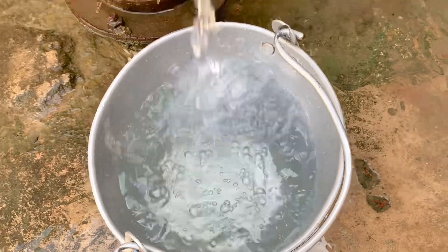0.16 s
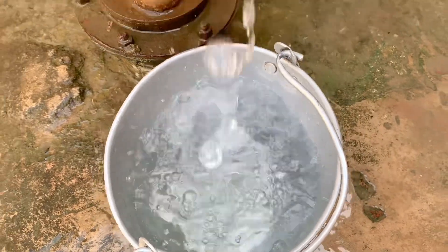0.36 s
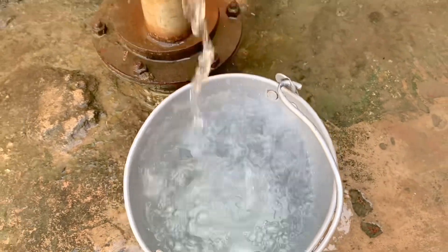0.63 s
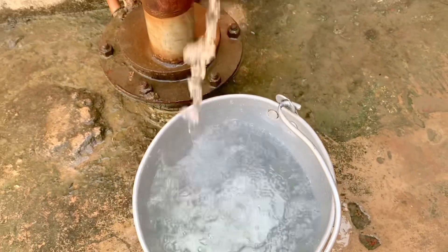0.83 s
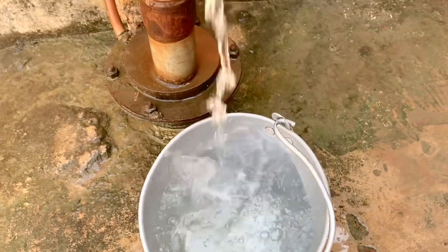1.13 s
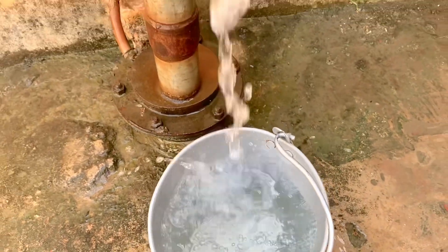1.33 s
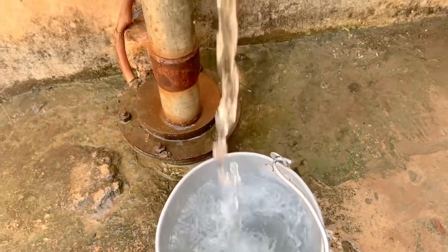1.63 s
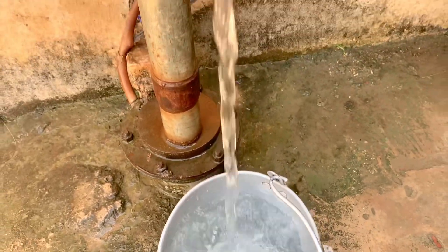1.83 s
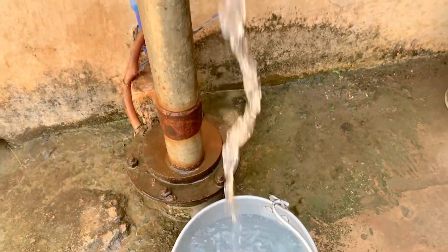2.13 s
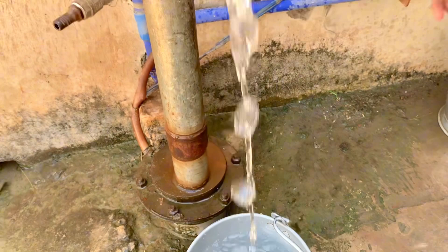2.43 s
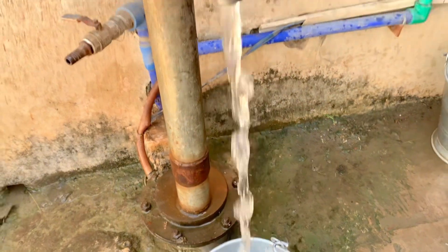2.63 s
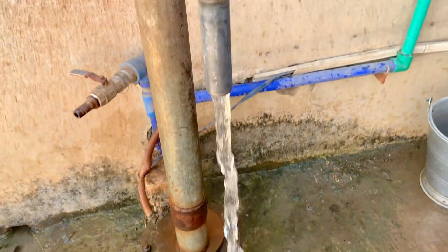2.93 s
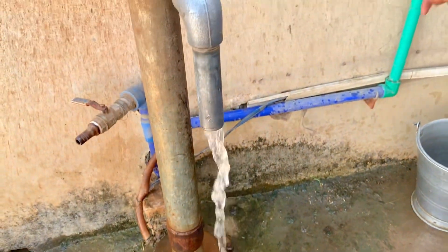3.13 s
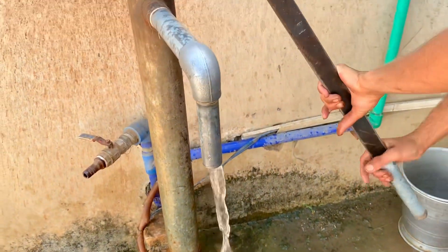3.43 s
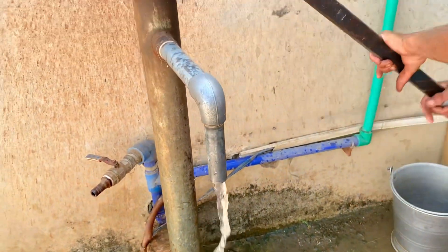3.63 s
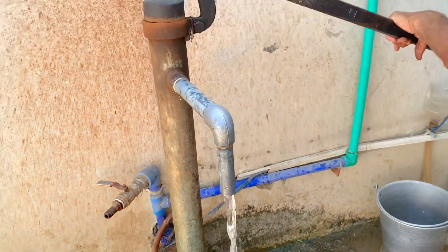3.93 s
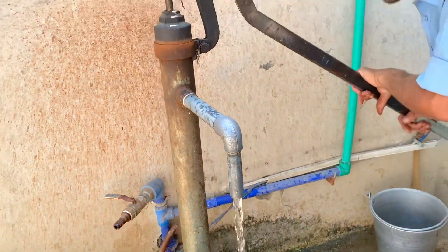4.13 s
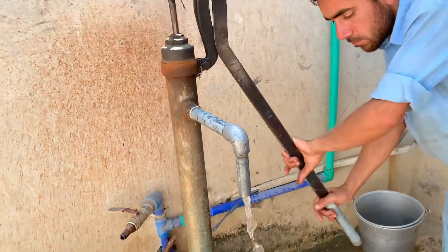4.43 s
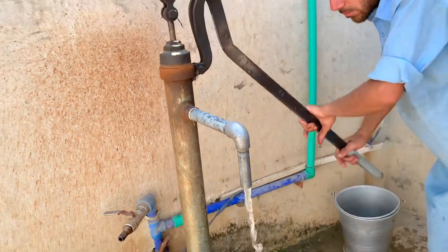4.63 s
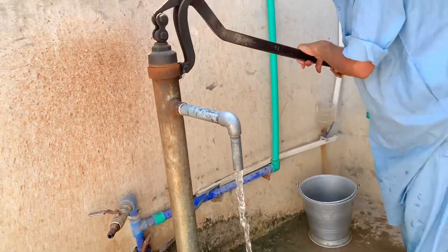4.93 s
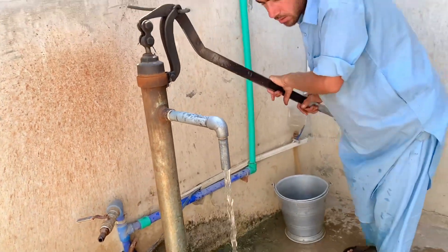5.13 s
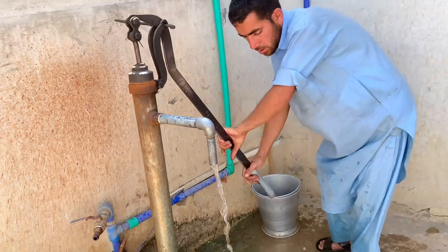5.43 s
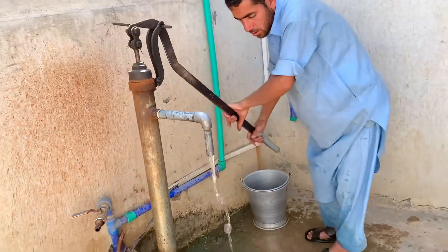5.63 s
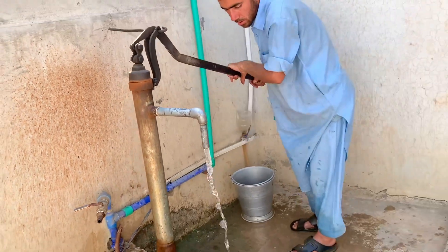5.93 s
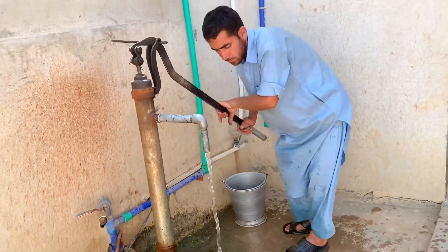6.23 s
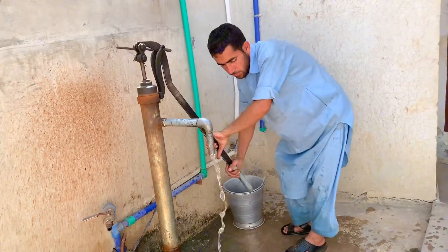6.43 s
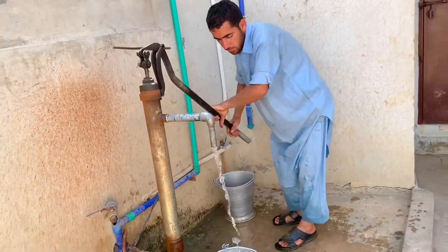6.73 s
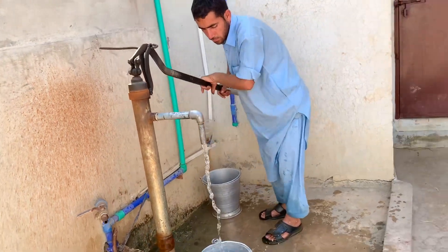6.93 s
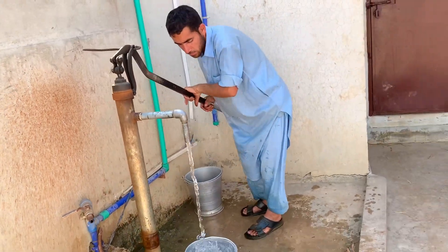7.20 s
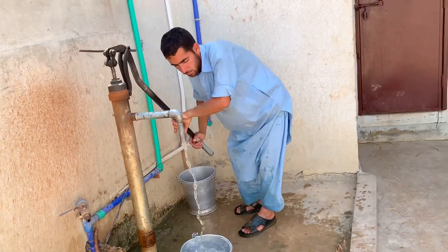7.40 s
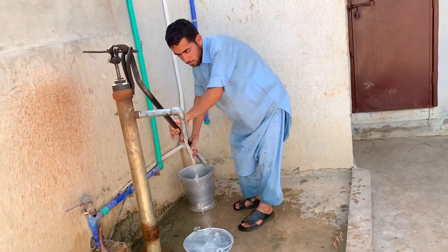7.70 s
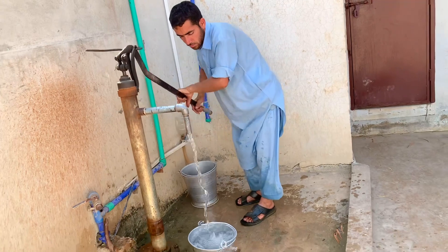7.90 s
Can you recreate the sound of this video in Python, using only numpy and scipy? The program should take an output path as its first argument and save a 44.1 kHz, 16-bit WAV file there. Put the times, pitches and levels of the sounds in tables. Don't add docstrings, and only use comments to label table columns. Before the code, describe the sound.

Close, bubbling water pours from a hand pump into a steel bucket outdoors, bright splats and rising blips growing quieter amid low wind bumps.

```python
import sys
import numpy as np
from scipy import signal
from scipy.fft import rfft, irfft
from scipy.io import wavfile
from scipy.ndimage import uniform_filter1d

SR = 44100
rng = np.random.default_rng(int(sys.argv[2]) if len(sys.argv) > 2 else 0)


def elevation(decibels):
    levels = np.asarray(decibels, float)
    return 10 ** (levels / 20)


def file_out(sig):
    cols = np.atleast_2d(sig).T
    lim = np.clip(cols, -1, 1)
    pcm = np.round(lim * 32767).astype(np.int16)
    wavfile.write(sys.argv[1], SR, pcm)


N = 355446

# time in seconds, level in dB.
GUST_CURVE = [(0.0, -47.5), (0.4, -37.5), (1.66, -43), (2.2, -43), (2.85, -41.5), (3.77, -39), (3.97, -43),
              (4.9, -39.5), (5.36, -38), (5.57, -38.5), (6.08, -36.5), (6.37, -44), (6.62, -42),
              (6.82, -41), (7.07, -37.5), (7.23, -42), (7.45, -41), (7.59, -40), (8.06, -40.5)]
# start in seconds, peak in dB, pitch in Hz.
WIND_KNOCKS = [
    (2.382, -17.5, 177),
    (3.131, -18, 188),
    (5.426, -12, 119),
    (5.477, -11.5, 161),
    (5.691, -14, 97),
    (5.737, -22, 66),
    (6.015, -14, 98.2),
    (6.099, -15.5, 105.4),
]
# start in seconds, peak in dB, pitch in Hz.
SOFT_KNOCKS = [(0.266, -28, 186), (0.95, -40, 54.3), (1.358, -21, 93), (1.472, -24.5, 72),
               (1.796, -22.5, 85), (2.555, -25, 86.5), (3.869, -24.5, 68), (4.146, -24, 182),
               (6.268, -24, 61), (6.598, -23, 82), (7.02, -24, 80), (7.208, -23.5, 68.4), (7.549, -24, 84),
               (7.699, -31, 62.7)]
# frequency in Hz, level in dB per Hz.
WIND_COLOUR = [(13, -30), (22, -49), (48, 4), (80, 1.5), (190, -3), (247, -9.5), (300, -8), (351, -8.5),
               (500, -26.5), (650, -58), (1100, -120)]
# frequency in Hz, phase turn in rad, level in dB, unshared part from 0 to 1.
PORT_DIFFERENCE = [(50, .35, -.1, .33), (160, .7, -.5, .42), (300, 0, -3.5, .35), (480, .3, -2.5, .7),
                   (650, 1.9, -4, .7), (860, 2.7, -1.9, .55), (1400, 3.4, 1.5, .5), (1850, 3.1, 2, .8),
                   (2400, 1.8, 0, .78), (3000, 2.8, 0, .72), (3900, 4.1, 0, .6), (4500, 3.8, 0, .33),
                   (16000, 3.8, 0, .42)]
# start in seconds, peak in dB.
JOLTS = [(0.165, -22), (0.265, -21), (0.496, -24), (3.13, -37), (4.006, -56), (4.13, -25.5), (4.933, -23.5),
         (5.001, -22.5), (5.237, -12.5), (5.994, -26.5), (6.93, -26.5), (7.05, -33), (7.151, -26),
         (7.303, -31.5)]
# time in seconds, resonance in Hz, its level in dB, deep gurgle over the rest in dB.
AIR_CURVE = [(0, 1150, 2.5, 18.5), (0.31, 1130, 4, 9.5), (0.38, 1127, -20, 10.5), (0.58, 1110, 8, 6.5),
             (0.801, 1160, 3.5, 12), (0.9, 1190, -6, 12.5), (1.002, 1210, 1, 13), (1.497, 1306, -1.5, 8),
             (2.2, 1450, -9, 10), (2.55, 1513, -7, 3), (2.9, 1590, -9, 7.5), (3.301, 1670, -8, 4.5),
             (4.402, 1645, -11, 8), (4.699, 890, -9, 4.5), (6.199, 873, -1, -2.5), (8.06, 888.4, -4, -4)]
# time in seconds, level in dB.
MOUTH_CURVE = [(0, -7), (1.5, -3), (2.6, -9), (4.2, -6.5), (5.5, -1.5), (6.1, 4), (6.5, -4), (7.1, -2),
               (8.06, -6)]
# frequency in Hz, level in dB per Hz.
GURGLE_COLOUR = [(210, -27), (350, -19.5), (458, -11), (561, -14.5), (700, -8), (1140, 0.5), (1320, 1.5),
                 (2250, 6.5), (2830, 2.5), (3500, -2), (4550, 4), (7700, -120)]
# start in seconds, peak in dB, pitch in Hz.
LARGE_BUBBLES = [(0.05, -7.5, 1060), (0.087, -11, 1130), (0.115, -28, 1220), (0.154, -12.5, 586),
                 (0.181, -37, 1110), (0.211, -9, 1080), (0.331, -10.5, 1130), (0.681, -15, 1180),
                 (0.754, -29, 1130), (0.786, -14.5, 1126), (0.981, -13, 1170), (1.029, -10, 1130),
                 (1.333, -8.5, 1176), (1.578, -12, 1840), (1.769, -13, 940), (2.12, -11.5, 1250),
                 (2.164, -17, 1420), (2.277, -4, 2170), (2.502, -16, 2100), (2.868, -12, 1180),
                 (2.901, -12.5, 780), (2.946, -15, 784), (3.126, -11, 1180), (3.401, -20, 1250),
                 (3.725, -12, 2280), (4.116, -5.5, 1270), (4.41, -12.5, 880), (4.81, -20, 1560),
                 (4.837, -14, 2290), (5.269, -9.5, 1620)]
# start in seconds, peak in dB, pitch in Hz.
MORE_LARGE_BUBBLES = [(0.269, -12.5, 566), (0.3, -8.5, 1030), (0.479, -20, 1270), (0.606, -14, 1110),
                      (0.698, -21, 1070), (1.203, -14, 1210), (1.414, -26, 1270), (1.671, -14, 1310),
                      (2.329, -16, 1040), (2.383, -8.5, 2220), (2.433, -20.5, 820), (2.802, -15, 2150),
                      (3.03, -19, 1700), (3.083, -21, 630), (3.145, -16, 1100), (3.928, -12.5, 1420),
                      (4.326, -21, 1470), (4.517, -18, 1460), (4.9, -6.5, 2200), (5.146, -11.5, 1650),
                      (5.516, -14, 1500), (5.555, -18, 1560), (5.802, -20, 1520), (5.902, -11, 1700),
                      (6.165, -15.5, 958), (6.239, -24, 745), (7.058, -18, 900), (7.159, -19, 1752),
                      (7.289, -24, 1290), (7.655, -18, 1320)]
# start in seconds, peak in dB, pitch in Hz.
SMALL_BUBBLES = [(0.462, -13.5, 1150), (0.815, -17, 1120), (1.052, -28, 3101), (1.242, -28, 3553),
                 (1.35, -35, 2756), (1.377, -27, 3208), (1.501, -22.5, 830), (1.545, -24, 2460),
                 (1.792, -32, 2950), (1.835, -32, 3402), (1.923, -22, 2239), (2.081, -40, 2283),
                 (2.104, -19, 830), (2.133, -32, 3553), (2.15, -26, 3596), (2.229, -14, 3600),
                 (2.352, -12, 1034), (2.68, -17, 3180), (2.734, -24, 790), (2.779, -16.5, 1094),
                 (2.971, -12, 2550), (3.105, -18.5, 720), (3.296, -19.5, 2550), (3.458, -23.5, 806),
                 (3.623, -50, 775), (4.019, -29, 3402), (4.365, -73, 1940), (4.954, -14, 1420),
                 (5.065, -16, 3260), (5.08, -14.5, 3430), (5.185, -49, 2500), (5.246, -22, 1190),
                 (5.349, -15.5, 2810), (5.373, -23, 2650), (5.43, -35, 430), (5.477, -43, 435),
                 (5.531, -15.5, 2110), (5.623, -20.5, 1970), (5.695, -29, 434), (5.968, -35, 1630),
                 (6.022, -29, 454), (6.216, -18.5, 3150), (6.339, -22, 1590), (6.4, -12.5, 3430),
                 (6.554, -30, 880), (6.569, -25, 890), (6.594, -52, 410), (6.632, -22, 2370),
                 (6.683, -42, 3590), (6.733, -31, 854), (6.826, -12, 3460), (7.083, -19, 2400),
                 (7.221, -22, 880), (7.486, -12, 3350), (7.551, -37, 2993), (7.668, -31, 2261),
                 (7.777, -17, 3300), (7.826, -29, 3359), (8.016, -37, 2347), (8.039, -25.5, 850),
                 (0.2, -27, 597), (0.32, -22.5, 530), (0.7, -22.5, 596), (0.94, -24, 1180),
                (1.035, -25, 490), (1.111, -13, 1880), (1.6, -24, 1430), (1.689, -21, 1400),
                (2.205, -17, 1460), (2.898, -21, 480), (3.09, -16, 1000), (3.128, -19, 700),
                (3.13, -12, 1660), (2.979, -19, 1050), (3.205, -27, 1210), (3.62, -15, 2230),
                (4.13, -20, 980), (4.546, -27, 1550), (4.99, -12, 2194), (5.085, -18, 1640),
                (5.57, -17, 1690), (5.72, -31, 810), (5.762, -28, 1610), (5.811, -29, 1530),
                (5.93, -28, 1470), (6.0, -28, 1530), (6.1, -26, 1700), (6.25, -23, 1390), (6.969, -26, 900),
                (6.999, -24, 1730), (7.1, -30, 1380), (7.179, -26, 890), (7.233, -16, 1320),
                (7.29, -29, 918), (7.44, -26, 1800), (7.489, -31, 1360), (7.635, -26, 1360),
                (7.9, -51, 1400)]
# time in seconds, level in dB.
FLOW_CURVE = [(0.0, -26), (0.18, -29.5), (0.29, -32.5), (1.55, -33), (2.06, -37.5), (2.38, -35),
              (2.94, -35), (3.66, -38), (3.99, -33.5), (4.15, -39.5), (4.37, -39), (4.58, -37.5),
              (4.83, -35.5), (5.27, -43.5), (5.61, -36), (5.88, -42.5), (7.61, -40.5), (8.06, -42)]
# frequency in Hz, level in dB per Hz.
SPRAY_COLOUR = [(1500, -14), (2800, -4), (3500, 0), (4600, -1), (5800, 1), (7200, 0), (8200, 1),
                (12000, -2), (14800, 0), (15700, -3), (19000, -3)]
SPRAY_BANDS = [1200, 3000, 4700, 9000, 13200, 19000]
# start in seconds, peak in dB, decay in seconds.
HEAVY_SLUGS = [(0.066, -9.5, 0.0023), (0.281, -8, 0.0026), (0.3292, -8.5, 0.0054), (0.432, -15.5, 0.0028),
               (0.48, -12, 0.0035), (0.551, -16.5, 0.0041), (0.784, -17, 0.0035), (0.9514, -13.5, 0.0053),
               (1.07, -8, 0.0023), (1.282, -14.5, 0.0027), (1.3364, -11, 0.0025), (1.476, -18, 0.0026),
               (1.543, -15.5, 0.0042), (1.5763, -14, 0.0025), (1.743, -22, 0.0026), (1.824, -14.5, 0.002),
               (2.164, -11, 0.0017), (2.385, -12, 0.0044), (2.7035, -13.5, 0.0026), (2.841, -19, 0.0028),
               (2.9453, -16, 0.011), (3.2915, -14.5, 0.0086), (3.3582, -15.5, 0.0034),
               (3.4437, -16, 0.0017), (3.695, -16.5, 0.0011), (4.4498, -18, 0.004), (4.892, -21.5, 0.029),
               (5.537, -22.5, 0.0031), (6.759, -25.5, 0.0039), (7.5522, -18.5, 0.003)]
# start in seconds, peak in dB.
LIGHT_SLUGS = [(0.038, -19), (0.3107, -9), (0.524, -5.5), (0.5976, -8), (0.643, -2.5), (0.8138, -25.5),
               (1.2222, -9.8), (1.246, -4.5), (1.354, -9), (1.3767, -7.5), (1.435, -5), (1.78, -11.5),
               (2.0016, -15), (2.2318, -10), (2.2758, -10), (2.5486, -19), (2.8054, -11), (3.0187, -18),
               (3.1278, -9.5), (3.4694, -10), (3.4801, -19), (3.7246, -11.5), (3.7351, -32),
               (3.8501, -11.5), (4.0087, -9.5), (4.1038, -16), (4.1468, -14.5), (4.3284, -17),
               (4.5173, -13.5), (4.5924, -19), (4.7158, -15), (4.8104, -24), (5.03, -17), (5.184, -16),
               (5.2692, -17), (5.495, -15), (5.5539, -14), (5.7166, -19), (5.904, -18), (6.4012, -22),
               (6.558, -18.5), (6.663, -18.5), (6.8285, -18), (7.0593, -15), (7.482, -13.5), (7.4954, -13),
               (7.6123, -20), (7.708, -18.5), (7.806, -15.5), (8.0008, -22)]
# start in seconds, peak in dB.
LIGHTER_SLUGS = [(0.016, -13), (0.1394, -34), (0.1515, -16), (0.171, -7), (0.187, -9), (0.257, -13),
                 (0.292, -6), (0.3737, -20), (0.495, -38), (0.724, -9), (0.9045, -8.5), (1.139, -10),
                 (1.203, -9.5), (1.412, -10.5), (1.704, -9.5), (1.902, -17), (1.9241, -13.5), (2.0122, -22),
                 (2.0354, -21), (2.092, -26), (2.3274, -10.5), (2.3443, -12), (2.372, -11), (2.4232, -10.5),
                 (2.499, -20), (2.586, -21), (2.6032, -12.5), (2.684, -15), (3.391, -14), (3.519, -15.5),
                 (3.5444, -22), (3.829, -17), (3.9984, -17), (4.4252, -16), (4.603, -15.5), (4.7523, -38),
                 (5.0133, -17), (5.0774, -15), (5.1427, -32), (5.2812, -13.5), (5.6823, -21), (6.0955, -43),
                 (6.2066, -18), (6.2196, -17), (6.8964, -20.5), (7.084, -17.5), (7.3264, -39),
                 (7.6673, -18), (7.829, -20), (8.014, -20),
                 (0.1189, -11), (0.4717, -36), (0.627, -11), (0.6644, -24), (0.695, -12), (0.984, -13.5),
                  (1.0584, -11), (1.5958, -8), (1.611, -30), (1.6691, -13), (1.8553, -31), (1.8853, -37),
                  (1.9431, -39), (2.137, -14.5), (2.238, -7), (2.4783, -29), (2.5103, -43), (2.526, -37),
                  (2.6481, -12), (2.7105, -13), (2.953, -14), (3.305, -10), (3.7802, -20.3), (3.9219, -20),
                  (3.9668, -23), (4.03, -28), (4.0826, -33), (4.3583, -43), (4.46, -23), (4.6663, -34),
                  (4.6867, -34), (4.975, -17), (5.0985, -27), (5.4505, -28), (5.4757, -18.5), (5.7446, -25),
                  (5.7614, -53), (5.8114, -27), (5.9128, -18), (5.9478, -28), (6.0523, -47), (6.24, -18.5),
                  (6.259, -18.5), (6.6853, -17), (6.8102, -39), (6.943, -20), (7.3628, -65), (7.78, -22),
                  (7.7883, -20), (7.8548, -20)]
STEREO_BANDS = [0, 96, 108, 120, 132, 144, 160, 176, 196, 216, 240, 264, 292, *range(320, 1025, 32)]

PORT_LAG_S = 0.000235
BUCKET_HZ, BUCKET_WIDTH_HZ, RING_S = 302, 26, 0.051
MOUTH_HZ, MOUTH_WIDTH_HZ = 1560, 360
CHURN_RISE_S, CHURN_FALL_S = 0.004, 0.05
CUTOFF_HZ = 15850
FRAME, FRAME_LEAD = 2048, 696


def rms_one(x):
    return x / np.sqrt(np.mean(x ** 2) + 1e-20)


def at_hz(hz, points, column=1):
    points = np.array(points)
    return np.interp(np.log(hz + 1), np.log(points[:, 0]), points[:, column])


def in_time(rows):
    s, *columns = np.transpose(rows)
    return [np.interp(np.arange(N) / SR, s, column) for column in columns]


def coloured(spectrum):
    hz = np.fft.rfftfreq(N, 1 / SR)
    low, high = spectrum[0][0], spectrum[-1][0]
    skirt = 1 / (1 + (low / (hz + 1)) ** 6 + (hz / high) ** 6)
    white = rfft(rng.standard_normal(N))
    return rms_one(irfft(white * elevation(at_hz(hz, spectrum)) * skirt, N))


def drift(rate):
    r = np.exp(-2 * np.pi * rate / SR)
    wander = signal.lfilter([1], [1, -2 * r, r * r], rng.standard_normal(N + SR))
    return rms_one(wander[SR:])


def add(out, s, sound):
    at = int(s * SR)
    out[at:at + len(sound)] += sound[:max(N - at, 0)]


def swells(rows, gain_db, rise_s, fall_s):
    out, t = np.zeros(N), np.arange(int(.4 * SR)) / SR
    shape = (1 - np.exp(-t / rise_s)) * np.exp(-t / fall_s)
    for s, peak_db, *_ in rows:
        add(out, s, elevation(2 * (peak_db + gain_db)) * shape / shape.max())
    return out


def bubble(hz, cycles, rise):
    t = np.arange(int(4 * cycles / hz * SR)) / SR
    decay = cycles / hz
    onset = 1 - np.exp(-t * hz * 2)
    return np.sin(2 * np.pi * hz * (t + rise * t * t / decay / 2)) * np.exp(-t / decay) * onset


def ports(x):
    hz = np.fft.rfftfreq(N, 1 / SR)
    turn = at_hz(hz, PORT_DIFFERENCE) - 2 * np.pi * hz * PORT_LAG_S
    own = np.clip(at_hz(hz, PORT_DIFFERENCE, column=3), 0, 1)
    paths = rng.standard_normal((5, 600)) * np.exp(-np.arange(600) / SR / .0025)
    shares = np.array([drift(25) for path in paths])
    shares = shares / np.sqrt(np.sum(shares ** 2, axis=0))
    scattered = sum(share * signal.oaconvolve(x, path)[:N] for share, path in zip(shares, paths))
    scattered = rms_one(scattered) * np.std(x)
    tilt = elevation(at_hz(hz, PORT_DIFFERENCE, column=2) / 2)
    shared = np.sqrt(1 - own ** 2) * np.exp(1j * turn) * rfft(x)
    right = tilt * (shared + own * rfft(scattered))
    return irfft(np.array([rfft(x) / tilt, right]), N)


def yard(x, lags_s, gain_db):
    out = np.zeros(N)
    for k, lag in enumerate(lags_s):
        add(out, lag, elevation(gain_db - 3.7 * k) * (-1) ** k * x)
    return signal.sosfilt(signal.butter(1, 6000, fs=SR, output="sos"), out)


def wind():
    gust_db, = in_time(GUST_CURVE)
    knocks = WIND_KNOCKS + SOFT_KNOCKS
    puffs = swells(knocks, -11.5, rise_s=0.0027, fall_s=0.02)
    wind_db = 10 * np.log10(elevation(2 * gust_db + 7.0) + puffs)
    out = elevation(wind_db - .8 + 2.2 * drift(14)) * coloured(WIND_COLOUR)
    for s, peak_db, hz in knocks:
        add(out, s, elevation(peak_db - 3.0) * bubble(hz, 3.1, rise=-0.011))
        hard_edge = bubble(2.31 * hz, 1.38, rise=-0.02)
        add(out, s + 0.00815, elevation(peak_db - 6.0) * hard_edge)
    return out


def bucket():
    jolt_power = swells(JOLTS, -3.5 - 19.0, rise_s=0.019, fall_s=0.12)
    hum_db = 10 * np.log10(elevation(2 * -47.5) + jolt_power)
    r, w = np.exp(-np.pi * BUCKET_WIDTH_HZ / SR), 2 * np.pi * BUCKET_HZ / SR
    shaken = signal.lfilter([1, 0, -1], [1, -2 * r * np.cos(w), r * r], rng.standard_normal(N))
    shaken = signal.sosfilt(signal.butter(2, [230, 390], "band", fs=SR, output="sos"), shaken)
    out = elevation(hum_db - 4.5) * rms_one(shaken)
    t = np.arange(int(RING_S * SR)) / SR
    ring = np.sin(np.pi * t / RING_S) * np.sin(2 * np.pi * BUCKET_HZ * t)
    for s, peak_db in JOLTS:
        add(out, s, elevation(peak_db - 6.5) * ring)
    return out


def air_column(gurgle_db):
    air_hz, air_db, _ = in_time(AIR_CURVE)
    phase = 2 * np.pi * np.cumsum(air_hz) / SR
    note = drift(38) * np.cos(phase) + drift(38) * np.sin(phase)
    return elevation(gurgle_db + air_db - 6 + 4.5 * drift(4.4)) * note


def churn_level(flow_db):
    calm_db = -41 + 0.62 * (flow_db - flow_db.mean())
    plunges = swells(LARGE_BUBBLES + MORE_LARGE_BUBBLES, -29, CHURN_RISE_S, CHURN_FALL_S)
    stirs = swells(HEAVY_SLUGS + LIGHT_SLUGS, -49, CHURN_RISE_S, CHURN_FALL_S)
    return 10 * np.log10(elevation(2 * calm_db) + plunges + stirs)


def bubble_swarm():
    swarm = np.zeros(N)
    air_s, air_hz, air_db, _ = np.transpose(AIR_CURVE)
    for when, pitch, size, life in rng.random((6500, 4)):
        s, hz = when * N / SR, 380 * 9.0 ** pitch
        off_tune = (hz / np.interp(s, air_s, air_hz) - 1) / .06
        voiced_db = np.interp(s, air_s, air_db + 7) / (1 + off_tune ** 2)
        size_db = at_hz(hz, GURGLE_COLOUR) + voiced_db - 3.24 * np.log(size + 0.018)
        add(swarm, s, elevation(size_db) * bubble(hz, 3.5 + 7.0 * life, rise=.03))
    return swarm


def standout_bubbles():
    bubbles = [(s, db + 1, hz) for s, db, hz in LARGE_BUBBLES + MORE_LARGE_BUBBLES]
    bubbles += [(s, db + 3, hz) for s, db, hz in SMALL_BUBBLES]
    out = np.zeros(N)
    for (s, peak_db, hz), (life, *mates) in zip(bubbles, rng.random((len(bubbles), 4))):
        add(out, s, elevation(peak_db - 7.5) * bubble(hz, 5.56 + 2.15 * life, rise=0.028))
        for mate in mates:
            mate_hz = hz * (0.623 + (7 * mate) % 1)
            add(out, s + .007 * mate, elevation(peak_db - 13) * bubble(mate_hz, 3.1, rise=0.025))
    return out


def gurgle(gurgle_db, surge):
    swarm = rms_one(bubble_swarm())
    wash = .5 + .08 * np.arange(N) / SR
    churn = swarm + wash * coloured(GURGLE_COLOUR)
    bed = elevation(2.0 * surge + 1.6 * drift(22.3)) * churn
    deep = signal.sosfilt(signal.butter(4, 780, fs=SR, output="sos"), bed)
    shrill = signal.sosfilt(signal.butter(4, 780, "high", fs=SR, output="sos"), bed)
    mouth = signal.lfilter(*signal.iirpeak(MOUTH_HZ, MOUTH_HZ / MOUTH_WIDTH_HZ, fs=SR), bed)
    shrill = shrill + elevation(in_time(MOUTH_CURVE)[0]) * mouth
    deep_db = in_time(AIR_CURVE)[2]
    return elevation(gurgle_db - 1.0) * (elevation(deep_db) * deep + shrill) + standout_bubbles()


def add_splats(power, splats, tints, band):
    t = np.arange(int(.06 * SR)) / SR
    edge = np.exp(-t[:400] / .003)[::-1]
    for (s, peak_db, decay), tint in zip(splats, tints):
        body_db = -9.5 * (band == 0)
        level_db = peak_db - 2.5 + 2.0 * tint[band] + body_db
        snap = 1.5 * np.exp(-t / 0.00099)
        burst = np.exp(-2 * t / max(decay, 1e-3))
        mist = 0.041 * np.exp(-t / 0.003)
        crack = (snap + burst + mist) * (1 - np.exp(-t / 0.0003))
        add(power, s, elevation(2 * level_db) * crack)
        add(power, max(s - 400 / SR, 0), elevation(2 * (level_db - 34 + 3 * tint[5])) * edge)


def spray(flow_db, surge):
    splats = [(s, db - 1, decay) for s, db, decay in HEAVY_SLUGS]
    splats += [(s, db - 7.5, 0.0041) for s, db in LIGHT_SLUGS + LIGHTER_SLUGS]
    tints = rng.standard_normal((len(splats), 6))
    noise, out = coloured(SPRAY_COLOUR), np.zeros(N)
    clump = elevation(1.8 * surge + 2.3 * drift(31))
    born = rng.random(N) < 400 * clump / SR
    size = np.minimum(rng.exponential(1, N), 2.8)
    for k, (low, high) in enumerate(zip(SPRAY_BANDS, SPRAY_BANDS[1:])):
        drops = born * elevation(7.5 * size + 6 * rng.standard_normal(N))
        droplets = signal.lfilter([1], [1, -np.exp(-1 / (0.00182 * SR))], drops + 1e-18)
        droplets = signal.lfilter([.06], [1, -.94], droplets)
        bed = elevation(4 * surge + 4.5 * drift(33) - 10.0)
        power = elevation(2 * (flow_db - 4 + 2.5)) * (bed + 0.5 * droplets)
        add_splats(power, splats, tints, k)
        band = signal.sosfilt(signal.butter(2, [low, high], "band", fs=SR, output="sos"), noise)
        out = out + np.sqrt(power) * band * (-1) ** k
    return out


def scene():
    flow_db, = in_time(FLOW_CURVE)
    gurgle_db = churn_level(flow_db)
    surge = drift(20)
    water = spray(flow_db, surge) + gurgle(gurgle_db, surge) + bucket() + air_column(gurgle_db)
    echoes = yard(water, [.0071, .0113, .019, .031, .047], gain_db=-13.0)
    return ports(water + echoes + wind())


def joint_stereo(x, under_db, waver_db, coarse, attack_db):
    x = np.pad(x, ((0, 0), (FRAME_LEAD, 0)))
    pair = np.array([x[0] + x[1], x[0] - x[1]]) / 2
    frames = signal.stft(pair, window="cosine", nperseg=FRAME)[2]
    count = frames.shape[2]
    top = round(CUTOFF_HZ / SR * FRAME)
    level_db = 10 * np.log10(np.add.reduceat(np.abs(frames) ** 2, STEREO_BANDS, axis=1) + 1e-20)
    weak = level_db < level_db[::-1] - under_db + waver_db * rng.standard_normal((1, 1, count))
    weak = np.repeat(weak, np.diff(STEREO_BANDS, append=1025), axis=1)
    weak[:, top:] = True
    treble_power = np.sum(np.diff(x, append=0) ** 2, axis=0)
    grain_db = 10 * np.log10(uniform_filter1d(treble_power, size=128) + 1e-20)
    jump_db = np.append(grain_db - uniform_filter1d(grain_db, size=1024), np.zeros(2048))
    jumps_db = np.array([jump_db[max(k * 1024 - 540, 0):k * 1024 + 540].max() for k in range(count)])
    steady = jumps_db < attack_db + waver_db / 4 * rng.standard_normal(count)
    treble = np.arange(1025)[:, None] >= 96
    step = rng.standard_normal((2, *frames.shape))
    stepped = (1 + coarse * (step[0] + 1j * step[1])) / np.sqrt(1 + coarse ** 2)
    frames *= np.where(steady & treble, stepped * ~weak, 1)
    frames[:, top:, jumps_db < attack_db + 7.5] = 0
    back = signal.istft(frames, window="cosine", nperseg=FRAME)[1]
    total, difference = back[:, FRAME_LEAD:FRAME_LEAD + N]
    return np.array([total + difference, total - difference])


def roll_off(x):
    return signal.sosfilt(signal.butter(12, 16980, fs=SR, output="sos"), x)


def record(dry):
    cut = signal.sosfilt(signal.ellip(8, .5, 24, CUTOFF_HZ - 20, fs=SR, output="sos"), dry)
    rounded = 1.1 * np.tanh(cut / 1.1)
    mix = joint_stereo(rounded, under_db=5.6, waver_db=.8, coarse=.42, attack_db=8.3)
    return roll_off(mix)


dry = scene()
out = record(dry)
file_out(out)
```